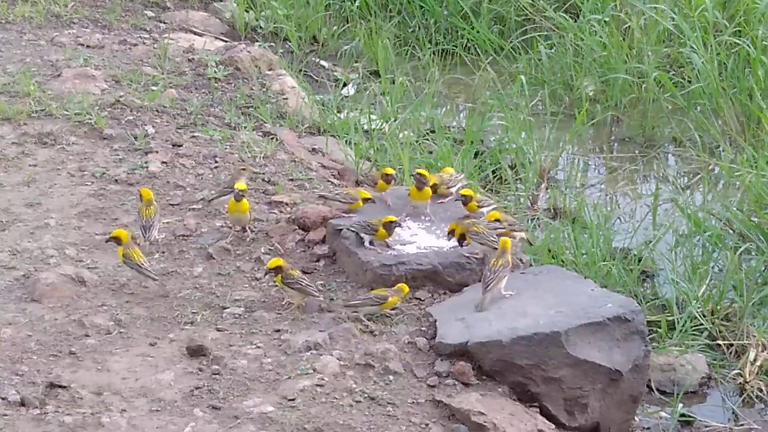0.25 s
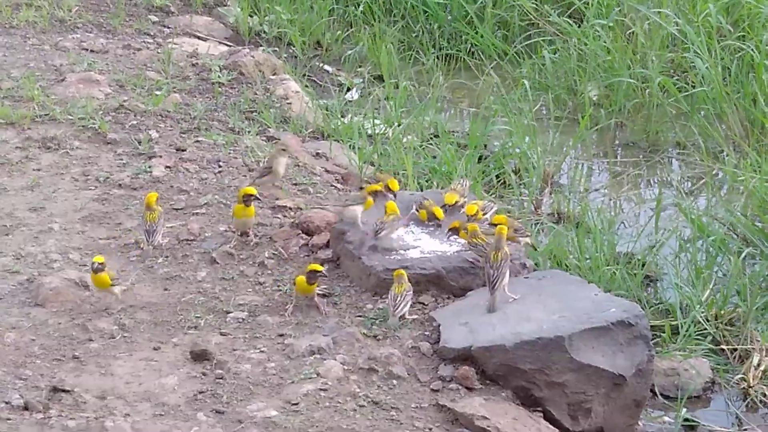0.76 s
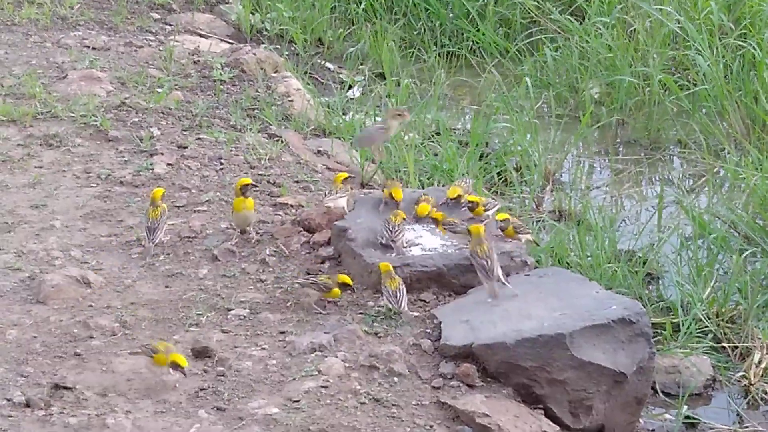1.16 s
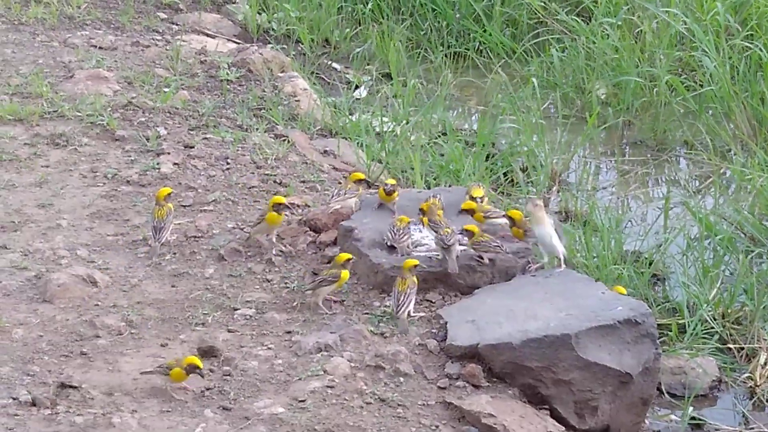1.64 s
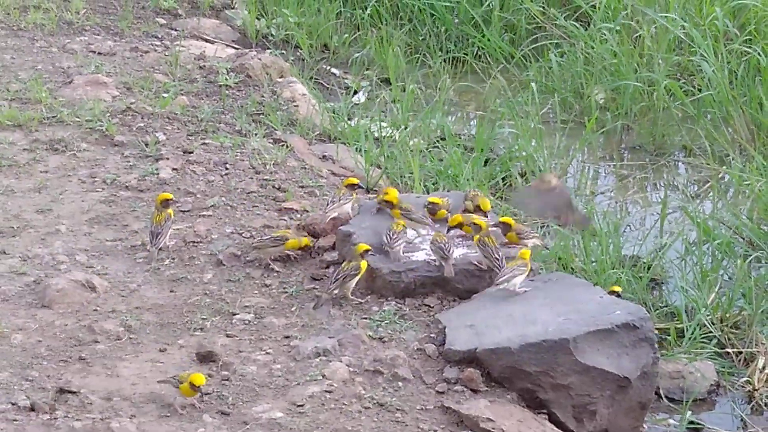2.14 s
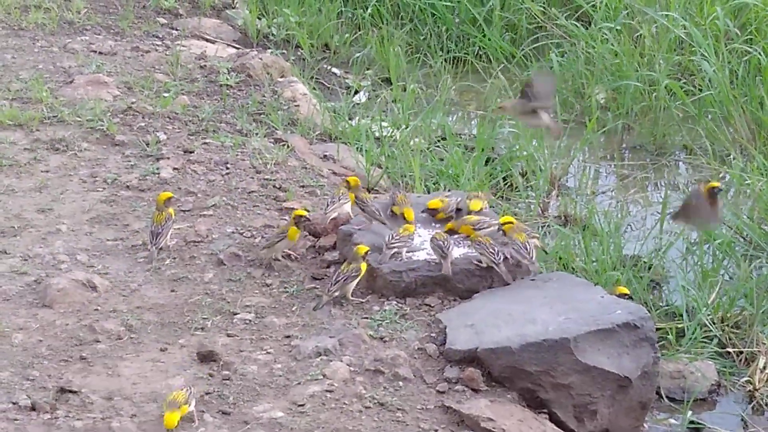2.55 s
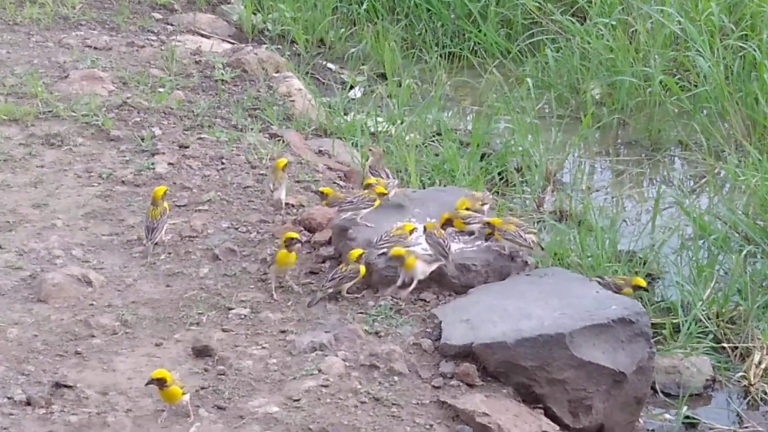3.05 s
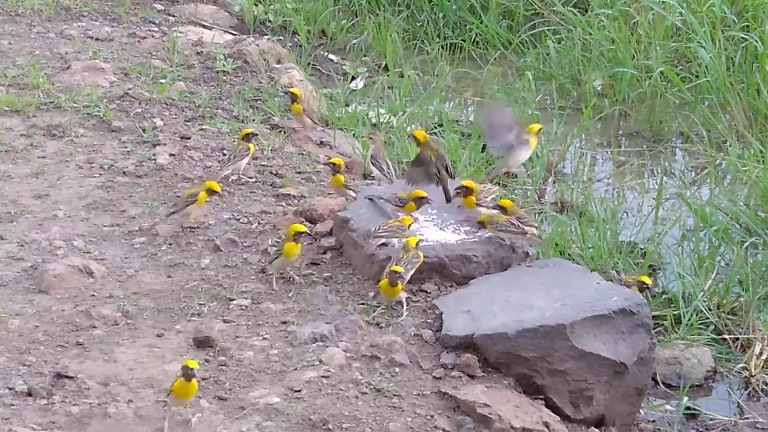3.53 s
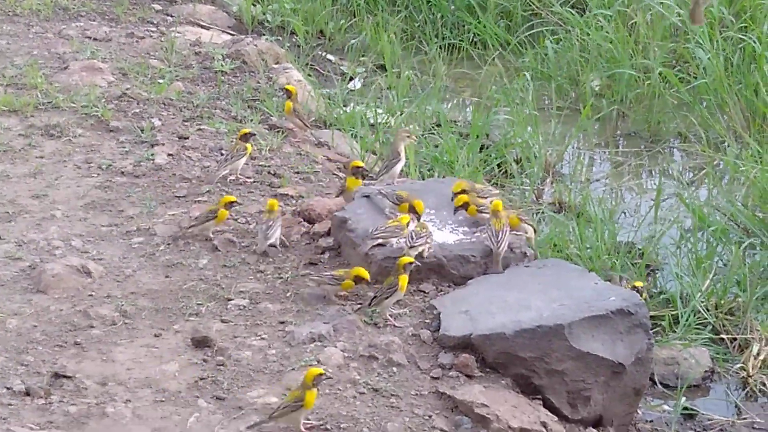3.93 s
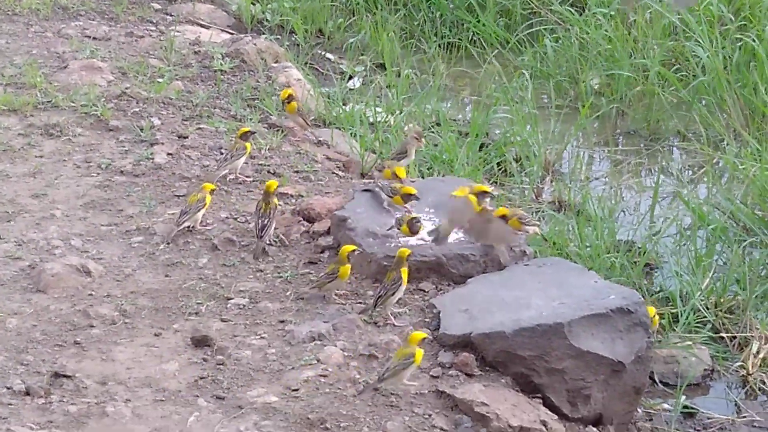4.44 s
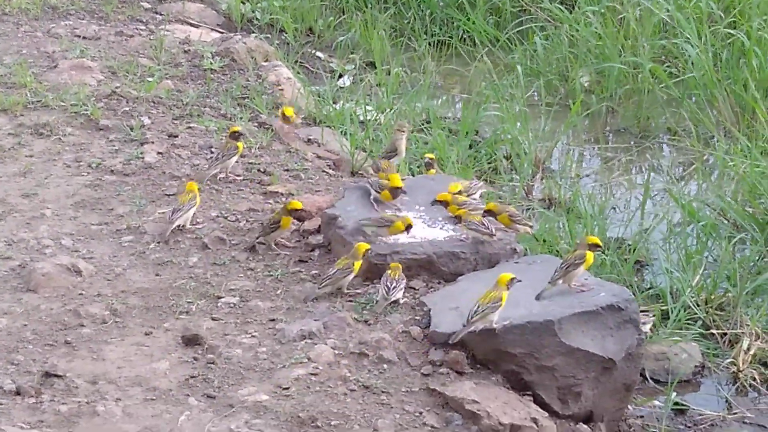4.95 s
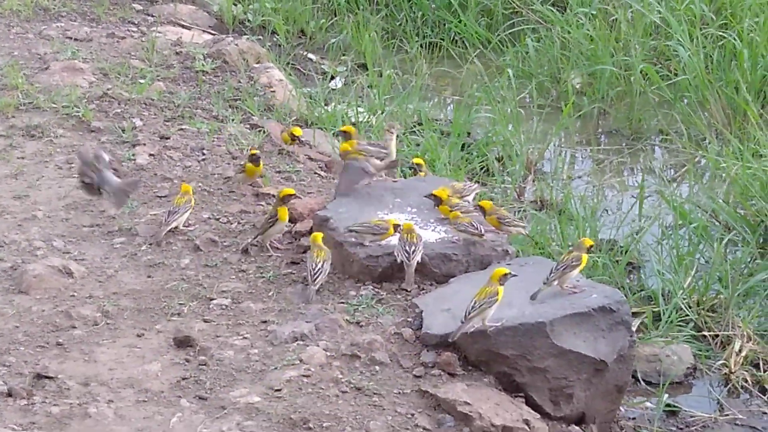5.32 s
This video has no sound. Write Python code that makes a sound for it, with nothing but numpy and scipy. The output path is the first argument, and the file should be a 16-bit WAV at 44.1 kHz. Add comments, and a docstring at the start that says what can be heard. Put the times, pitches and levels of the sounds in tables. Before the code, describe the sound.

A flock of small weaver birds chatters densely outdoors, quick falling whistles breaking into harsh rasping chirps, with short pauses and faint low rumble.

```python
"""On a stone by a pond, a flock of weaver birds chatters, off to the right of a small stereo camera.
Many calls open with a two-voiced whistle (gliding sines) and break into a rasp (shaken sines and noise).
Single whistles and quick trills come between; banks and reeds echo them as fading noise.
Short ticks ring the microphone (fading sines), a far bird pips, and dull thuds, rumble, hum, a hoot
and air noise lie beneath.
"""
import sys
import numpy as np
from scipy import signal
from scipy.fft import rfft, irfft
from scipy.io import wavfile
from scipy.ndimage import uniform_filter1d

SR = 44100
rng = np.random.default_rng(int(sys.argv[2]) if len(sys.argv) > 2 else 0)


def digitize_waveform(pressure):
    """Quantize a signal to 16-bit integers and store it at the path in sys.argv[1].

    Rows of a 2-D input are taken as channels; values are limited to [-1, 1].
    """
    field = np.atleast_2d(pressure).T
    bounded = np.clip(field, -1, 1)
    quanta = np.round(bounded * 32767).astype(np.int16)
    wavfile.write(sys.argv[1], SR, quanta)


N = 246078

# A swell is the level change from start to end of a sound.
# Openings of calls, two voices at once: t/s, length/s, start f/Hz of the falling voice's root (heard at
# its octave), falling voice level/dB, held voice level/dB, third partial level/dB
OPENINGS = [(0.036, 0.035, 2562, -39, -54.5, -44.5), (0.206, 0.038, 2630, -43, -44.5, -54),
            (0.862, 0.016, 2830, -40, -66, -51), (1.173, 0.031, 2520, -39.5, -46.5, -39.5),
            (1.633, 0.021, 2680, -58, -56, -47.5), (2.373, 0.032, 2710, -43, -64, -44),
            (2.404, 0.02, 2740, -47.5, -44.5, -48), (2.55, 0.024, 2650, -39, -50, -41.5),
            (2.655, 0.024, 2480, -31, -39.5, -60), (2.998, 0.022, 2980, -36, -44.5, -44),
            (3.168, 0.045, 2670, -39.5, -42.5, -41), (3.341, 0.025, 2780, -35.5, -43.5, -56),
            (3.511, 0.025, 2850, -32, -46, -35.5), (3.687, 0.021, 2530, -32, -40, -40.5),
            (3.78, 0.019, 2850, -36, -66, -67), (4.122, 0.024, 2850, -43.5, -38, -52),
            (4.294, 0.022, 2550, -38.5, -37.5, -38.5), (4.566, 0.024, 2730, -40, -41, -45),
            (4.803, 0.03, 2500, -39, -43, -58), (5.201, 0.025, 2680, -43.5, -45.5, -44.5),
            (5.37, 0.026, 2550, -44, -49.5, -40), (5.526, 0.02, 2700, -44, -47.5, -45)]
FALL_SHARE, FALL_BEND = .37, 1.2  # how far (share of the pitch) and how curved the fall is
FALL_ROOT_DB, FALL_SWELL_DB = -23, 4  # the root is weaker than its octave
HELD_HZ, HELD_SAG, HELD_S = 2622, 0.0642, 0.0343  # sag is a share of the pitch
HELD_OCTAVE_DB, HELD_SWELL_DB = -35, -17.5

# Single whistled notes: t/s, length/s, start f/Hz, middle f/Hz, end f/Hz (before the hooks at the ends),
# level/dB, octave level/dB above the note, swell/dB
NOTES = [(0.073, 0.051, 3900, 4100, 3400, -37, -22, 1.5), (0.115, 0.03, 2920, 2850, 2750, -43, -18, -8),
         (0.24, 0.06, 2650, 2800, 2750, -45, -24, -3), (0.292, 0.067, 3660, 2800, 2220, -43, 5, 1.5),
         (0.421, 0.072, 5000, 3080, 2100, -30, -28, 0), (0.449, 0.048, 3960, 4100, 4100, -32.5, -36, -6),
         (0.606, 0.063, 3700, 2760, 2170, -37, 2.5, -0.6), (0.801, 0.077, 4000, 2900, 2600, -38, -17, -6),
         (1.268, 0.054, 3950, 3050, 2600, -35, -20, -7), (1.41, 0.076, 4200, 3100, 2500, -36, -8, -9),
         (1.68, 0.088, 3950, 2875, 2400, -39.5, 0, -3), (1.816, 0.022, 3600, 2600, 1700, -42.5, -30, -11),
         (2.098, 0.076, 3600, 2860, 2500, -35.5, -13, 0.6), (2.18, 0.087, 2540, 2480, 2600, -39.5, -23, 6),
         (2.317, 0.074, 4150, 2870, 2300, -38, -11, -14), (2.591, 0.031, 2750, 2560, 2500, -37.5, -34, 3),
         (2.857, 0.044, 3500, 2870, 2550, -34, -0.6, -2.5), (3.41, 0.051, 3035, 2880, 2650, -42, 5, 6),
         (3.62, 0.028, 4100, 3700, 2760, -44, 9, 4), (4.282, 0.04, 3700, 2980, 2800, -36, -19, -7),
         (4.52, 0.032, 3750, 3090, 2270, -45.5, 2.5, -6)]
NOTE_LINGER, NOTE_THIRD_DB = .1, -22  # a slide lingers near its middle pitch
NOTE_HOOK, NOTE_HOOK_S = .14, .003  # scoop up into the start: share of the pitch, time
NOTE_DROP, NOTE_DROP_S = .12, .005  # drop off the end: share of the pitch, time
BEAK_TOP_HZ, BEAK_TOP_DB_PER_KHZ = 8000, -8  # the open beak dulls what lies above

# Quick trills, each opened by one wide arch: t/s, arch included; length/s after the arch,
# rate/chirps per second, arch level/dB, trill level/dB
TRILLS = [(0.383, 0.032, 70, -38, -37), (0.562, 0.033, 69, -36, -38), (1.381, 0.0357, 85, -35, -35),
          (1.633, 0.034, 91, -39, -37)]
TRILL_HZ, ARCH_S = 2315, .0115
ARCH_HZ, ARCH_DB = (2050, 2850, 2450, 1700), (0, -4, -22)  # pitches along the arch, its three partials

# Rasped calls: t/s, length/s before a 10 ms tail, low voice level/dB, swell/dB, throat f/Hz,
# throat level/dB and overtone level/dB above the low voice, roughness 0-1
RASPS = [(0.045, 0.084, -42, -4, 4066, 5.5, -3, 0.42), (0.226, 0.18, -45, -20, 3930, 3.5, -11, 0.39),
         (0.39, 0.1, -38.5, 0, 3964, 5, -2, 1), (0.575, 0.098, -43.5, -21, 3660, 7.5, -3.5, 0.565),
         (0.672, 0.061, -46.5, 2.5, 3883, 12, 5.5, 0.38), (0.861, 0.076, -49, -24, 3960, 6.5, 10.5, 0.65),
         (1.182, 0.13, -35.5, -9, 3955, -3.5, -6.5, 1), (1.387, 0.08, -46, -28, 3820, 7, -3.5, 0.76),
         (1.643, 0.14, -44, -13, 3740, 0, -2.5, 0.89), (1.824, 0.04, -63, -19, 3880, 9, -17.5, 0.93),
         (2.159, 0.12, -36, 2, 4070, 4, -2.5, 0.95), (2.379, 0.13, -40.5, 8.5, 3705, 2, -16.5, 0.461),
         (2.567, 0.088, -41.5, -1, 3874, 6.5, -3, 0.52), (2.66, 0.1, -32, 1, 3990, 5, -5, 0.44),
         (2.79, 0.082, -34.5, -1, 3760, 1.06, -8.5, 0.67), (2.893, 0.066, -37, -9, 3774, 3, 2, 1),
         (3.005, 0.13, -41, -6.5, 3800, 3, -4, 0.74), (3.179, 0.12, -38, 0, 4030, 6.5, 5.5, 0.9),
         (3.358, 0.14, -35.5, -5.5, 4006, 2.5, 3, 0.72), (3.525, 0.12, -36, 2, 4100, 8.5, 3.5, 0.78),
         (3.704, 0.087, -33.5, 10, 3905, 0, -12.5, 0.35), (3.785, 0.11, -35.5, 0.5, 4036, 11.5, -1, 0.57),
         (3.896, 0.092, -35.5, -11.5, 3843, 2.5, -13.5, 0.306),
         (4.137, 0.1, -38.5, -11.5, 3850, 3, -9.5, 0.55), (4.3, 0.11, -34, -1.5, 3806, 2, -4.5, 0.75),
         (4.577, 0.09, -35, 8, 3828, 1.5, -2.5, 0.69), (4.815, 0.064, -39, -5, 3635, -2, 4.5, 0.62),
         (5.212, 0.097, -38.5, 1.5, 3930, 6.5, 5, 0.68), (5.376, 0.067, -43.5, -2, 4000, 3.5, 6, 0.84),
         (5.541, 0.039, -40.5, -2, 4270, 6.5, 4, 1)]
GAP_DB, GAP_PER_OVERTONE = -6, 0.45  # level between throat and overtone, and its rise per dB of overtone
SPILL_DB, SPILL_PER_OVERTONE = -17.5, 0.0667  # the same for the wide noise

# Short ticks: t/s, level/dB before the shared boost
TICKS = [(1.808, -39), (2.0066, -40.5), (4.507, -54), (5.151, -44), (5.5008, -49)]
# Ringing of the microphone when a tick strikes it: f/Hz, relative level/dB, time to fade by 60 dB/s
TICK_MODES = [(4150, 1, 0.007), (7400, 7, 0.00446), (13430, -4, 0.0042)]

# A far bird's faint run of pips: t/s, length/s, rate/pips per second, start f/Hz, fall/Hz, level/dB
FAR_PIPS = (5.012, .125, 37, 6150, 550, -60)

ECHO_T60_S, ECHO_DB = 0.3096, -8  # time to fade by 60 dB; level at the right port
# Left port against right for sound from the right: f/Hz, level/dB
LEFT_SHADE = [(700, 0), (1500, -7.5), (2400, -7.5), (4400, -14), (7400, -29), (9000, -25), (11000, -8.5),
              (15000, -11.5)]
# Cavity in front of the right microphone: f/Hz, width/Hz, level/dB
PORT_MODES = [(3570, 560, -7), (7000, 87, 8)]

# Soft low bumps, strongest at the left port: t/s, level/dB before a shared trim
BUMPS = [(2.119, -52.5), (2.97, -51.5), (3.798, -46)]

# Shape of the air noise at each port: f/Hz, relative level/dB per Hz
AIR_LEFT = [(18, -80), (30, -25), (97, -7.5), (139, -3), (355, -10.5), (426, -9), (472, -10.5), (716, -17),
            (1000, -15), (1480, -16.5), (11000, -35), (13200, -28), (15000, -51)]
AIR_RIGHT = [(30, -35), (100, -9), (200, -8), (400, -8), (800, -2.5), (1500, -7.5), (3000, -8.5),
             (5000, -10), (7500, -16), (10000, -18), (15000, -27.5)]
AIR_LEFT_DB, AIR_RIGHT_DB = -63, -63  # overall noise level before the slight shared flicker
# Hum tones: f/Hz, level/dB before wavering and doubling
HUM = [(96.9, -88), (296.1, -79)]
# A far soft hoot: t/s, length/s, f/Hz, level/dB at the left port
HOOT = (.22, .2, 435, -65)
TOP_HZ = 14300


def undb(db):
    """Gain of a level in dB."""
    return 10 ** (np.asarray(db) / 20)


def unit(x):
    """Scale to an average strength (rms) of 1."""
    return x / np.sqrt(np.mean(x ** 2))


def band(x, lo_hz, hi_hz, order=2):
    """Keep the sound between two pitches (Butterworth band-pass)."""
    return signal.sosfilt(signal.butter(order, [lo_hz, hi_hz], "band", fs=SR, output="sos"), x)


def colour(x, points):
    """Shape the spectrum along (f/Hz, level/dB) points."""
    hz, db = np.transpose(points)
    f = np.fft.rfftfreq(N, 1 / SR) + 1
    gain = undb(np.interp(np.log(f), np.log(hz), db))
    return irfft(rfft(x) * gain, N)


def wobble(size, rate):
    """Smooth random curve of spread 1 that changes about rate times a second."""
    k = max(int(SR / rate), 1)
    return unit(uniform_filter1d(uniform_filter1d(rng.standard_normal(size), k), k))


def add(out, s, x):
    """Mix x into out from time s."""
    i = int(s * SR)
    out[i:i + len(x)] += x[:N - i]


def edges(size, rise_s, fall_s):
    """Fade in and out with short ramps."""
    t = np.arange(size) / SR
    return np.clip(np.minimum(t / rise_s, t[::-1] / fall_s), 0, 1)


def shaky(hz, jitter, rate):
    """Phase of a voice whose pitch shakes at random."""
    return 2 * np.pi * np.cumsum(hz * (1 + jitter * wobble(len(hz), rate))) / SR


def beak_db(hz):
    """The open beak lifts pitches near its resonance and dulls the top."""
    resonance = 5.89 * np.exp(-((hz - 4600) / 450) ** 2)
    return resonance + BEAK_TOP_DB_PER_KHZ * np.maximum(hz - BEAK_TOP_HZ, 0) / 1000


def whistle(out, s, length, path, partials_db, swell_db):
    """A gliding sine with two overtones; each partial swells as it crosses the open beak's resonance."""
    size = int((length + 0.00384) * SR)
    u = np.linspace(0, 1, size)
    hz = uniform_filter1d(path(u), size // 12, mode="nearest")
    phase = shaky(hz, 0.011, 190)
    tone = sum(undb(db + beak_db(k * hz)) * np.sin(k * phase) for k, db in enumerate(partials_db, 1))
    loudness = undb(swell_db * (u - .5) + 2.2 * wobble(size, 250))
    add(out, s, np.sqrt(2) * tone * loudness * edges(size, 0.005, 0.007))


def whistles():
    """One voice falls away from another that holds; single notes slide; an arch rises before each trill."""
    out = np.zeros(N)
    for s, length, hz, fall_db, held_db, third_db in OPENINGS:
        falling = lambda u: hz * (1 - FALL_SHARE * u ** FALL_BEND)
        whistle(out, s, length, falling, (fall_db + FALL_ROOT_DB, fall_db, third_db), FALL_SWELL_DB)
        held = lambda u: HELD_HZ * (1 - HELD_SAG * np.sqrt(u))
        held_partials_db = (held_db, held_db + HELD_OCTAVE_DB, third_db - 12)
        whistle(out, s, HELD_S, held, held_partials_db, HELD_SWELL_DB)
    for s, length, start, middle, end, db, octave_db, swell_db in NOTES:
        bow = middle - (start + end) / 2
        scoop = lambda u: NOTE_HOOK * np.exp(-u * length / NOTE_HOOK_S)
        drop = lambda u: NOTE_DROP * np.exp((u - 1) * length / NOTE_DROP_S)
        slide = lambda u: start + (end - start) * (u + NOTE_LINGER * np.sin(2 * np.pi * u))
        path = lambda u: (1 - scoop(u) - drop(u)) * (slide(u) + bow * np.sin(np.pi * u))
        whistle(out, s, length, path, (db, db + octave_db, db + NOTE_THIRD_DB), swell_db)
    for s, _, _, db, _ in TRILLS:
        arch = lambda u: np.interp(u, np.linspace(0, 1, 4), ARCH_HZ)
        whistle(out, s, ARCH_S, arch, db + np.array(ARCH_DB), -7)
    return out


def rasps():
    """Both halves of the voice organ shake: a throat voice with its octave, a slurring low voice, and breath."""
    out = np.zeros(N)
    for s, length, db, swell_db, throat_hz, throat_db, over_db, rough in RASPS:
        size = int((length + .01) * SR)
        u = np.linspace(0, 1, size)
        puffs = rng.standard_normal((5, size)) * undb([2.5 * wobble(size, 300) for _ in range(5)])
        flutter = undb([4 * rough * wobble(size, 296) for _ in range(3)])

        upper_hz = throat_hz * (1.02 - .05 * u ** 2 + .04 * rough * wobble(size, 90))
        upper = shaky(upper_hz, .065 * rough, 900)
        # the lower voice slides down and snaps back about 30 times a second
        slur = (np.cumsum(1 + 0.312 * wobble(size, 30)) * 30 / SR + rng.random()) % 1
        lower = shaky(3050 * (1.08 - .18 * slur + .04 * wobble(size, 40)), .06 * rough, 900)
        low = band(flutter[0] * np.sin(lower) + 1.4 * rough * puffs[0], 2100, 3500, order=3)
        throat = band(flutter[1] * np.sin(upper) + 1.2 * rough * puffs[1], 3300, 4900)

        # a fall like the opening's returns faintly in some slurs
        falls = np.sin(shaky(5900 * (1 - .5 * slur), .04, 900)) * (slur < .6) * (wobble(size, 30) > 0)
        gap = band(1.6 * falls + puffs[2], 4000, 6600, order=3)
        over = band(flutter[2] * np.sin(2 * upper) + 2 * rough * puffs[3], 6200, 7800)
        over = over * undb(3.5 * wobble(size, 31))

        # bright calls also spill more wide noise, with a trace of the throat's third partial
        spill_db = SPILL_DB + SPILL_PER_OVERTONE * over_db + 2.54 * wobble(size, 40)
        spill = undb(spill_db) * unit(band(0.047 * np.sin(3 * upper) + puffs[4], 3150, 6040, order=1))

        share_db = 0, throat_db, GAP_DB + GAP_PER_OVERTONE * over_db, over_db
        voice = sum(undb(d) * unit(p) for p, d in zip((low, throat, gap, over), share_db))
        voice = voice + np.std(voice) * spill
        add(out, s, voice * undb(db + swell_db * (u - .5)) * edges(size, 0.016, 0.019))
    return out


def trills():
    """The pitch swings up and down once a chirp; the voice is loudest on the way down."""
    out = np.zeros(N)
    for s, length, rate, _, db in TRILLS:
        size = int(length * SR)
        swing = 2 * np.pi * rate * np.arange(size) / SR
        phase = shaky(TRILL_HZ * (1 - 0.11 * np.cos(swing)), 0.013, 500)
        tone = np.sin(phase) + undb(2.5) * np.sin(1.65 * phase)
        pulse = 1 - .9 * np.sin(swing + .5)
        add(out, s + ARCH_S, undb(db) * tone * pulse * edges(size, .003, .005))
    return out


def ticks():
    """Short ticks: a click sets the microphone's resonances ringing for milliseconds."""
    out, t = np.zeros(N), np.arange(600) / SR
    ring = sum(undb(db - 60 * t / t60) * np.sin(2 * np.pi * hz * t) for hz, db, t60 in TICK_MODES)
    for s, db in TICKS:
        add(out, s, undb(db + 3.0) * ring)
    return out


def echo(x):
    """Scattered returns from banks and reeds: fading noise, different at each port."""
    t = np.arange(int(.6 * SR)) / SR
    tail = rng.standard_normal((2, len(t))) * undb(-60 * t / ECHO_T60_S) * np.clip(t / 0.00088, 0, 1)
    tail /= np.sqrt(np.sum(tail ** 2, axis=1, keepdims=True))
    return signal.fftconvolve(x[None], tail, axes=1)[:, :N]


def far_pips():
    """A far bird's short pips at an even pace, each falling in pitch."""
    out = np.zeros(N)
    s, length, rate, hz, fall_hz, db = FAR_PIPS
    u = np.arange(int(length * SR)) * rate / SR % 1
    # each pip sounds for half its turn, so the doubled slope falls by fall_hz
    tone = np.sin(shaky(hz - 2 * fall_hz * u, 0.011, 300))
    add(out, s, undb(db) * tone * np.clip(np.sin(2 * np.pi * u), 0, 1))
    return out


def bumps():
    """Short dull thuds of fading low noise, as of a gust or a touch on the camera."""
    out, t = np.zeros(N), np.arange(2000) / SR
    for s, db in BUMPS:
        thud = unit(band(rng.standard_normal(len(t)), 60, 330, order=1))
        add(out, s, undb(db - 1.5 - 60 * t / 0.085) * thud)
    return np.array([out, 0.18 * out])


def hum_and_hoot():
    """Steady low tones that waver in level and phase, and one soft hoot that swells and fades."""
    t = np.arange(N) / SR
    hum = sum(undb(db + 1.0 * wobble(N, 2)) * np.sin(2 * np.pi * hz * t + .9 * wobble(N, 24))
              for hz, db in HUM)
    s, length, hz, db = HOOT
    hoot = undb(db) * np.sin(2 * np.pi * hz * t) * np.sin(np.pi * np.clip((t - s) / length, 0, 1))
    return 2 * hum + hoot


def air():
    """Far rumble and hiss, partly shared by the ports, under hum and hoot that are strongest on the left."""
    shared, own = rng.standard_normal((2, N))
    left = undb(AIR_LEFT_DB) * unit(colour(shared, AIR_LEFT))
    # the ports share mainly the low part of the noise
    bass = signal.sosfilt(signal.butter(1, 900, fs=SR, output="sos"), shared - own)
    right = undb(AIR_RIGHT_DB) * unit(colour(own + 0.415 * bass, AIR_RIGHT))
    tones = hum_and_hoot()
    return undb(0.39 * wobble(N, 12)) * np.array([left + tones, right + 0.23 * tones])


def scene():
    """The flock reaches the right port first; the left one hears it shaded by the camera body."""
    flock = whistles() + trills() + far_pips() + rasps() + ticks()
    left_echo, right_echo = undb([[ECHO_DB + 11.0], [ECHO_DB]]) * echo(flock)
    # sound from all sides rings the port cavity
    cavity = sum(undb(db) * band(right_echo, hz - w / 2, hz + w / 2, order=1) for hz, w, db in PORT_MODES)
    left = colour(np.roll(flock, 2) + left_echo, LEFT_SHADE)  # two samples later
    right = flock + right_echo + cavity
    return np.array([left, right]) + air() + bumps()


def record(dry):
    """The recorder cuts the top steeply."""
    return signal.sosfilt(signal.ellip(10, .2, 60, TOP_HZ, fs=SR, output="sos"), dry)


dry = scene()
out = record(dry)
digitize_waveform(out)
```